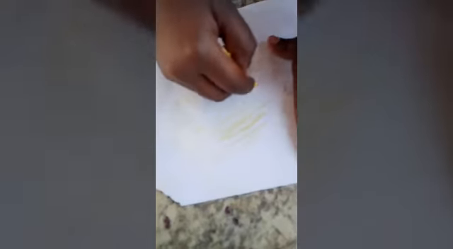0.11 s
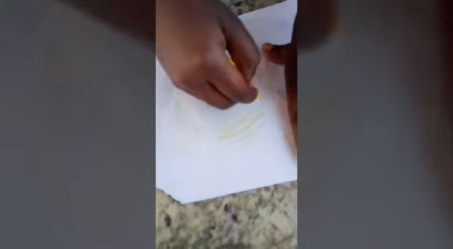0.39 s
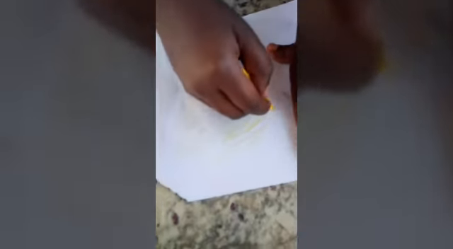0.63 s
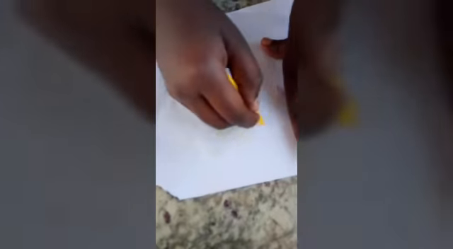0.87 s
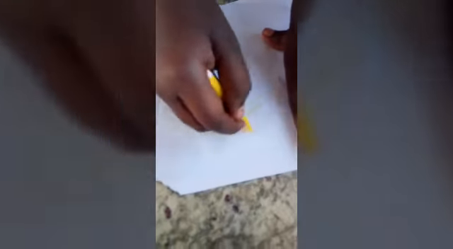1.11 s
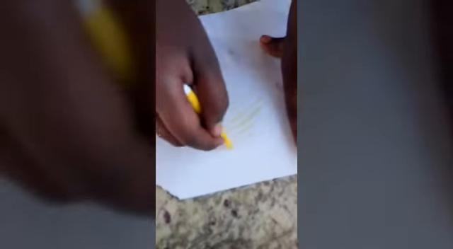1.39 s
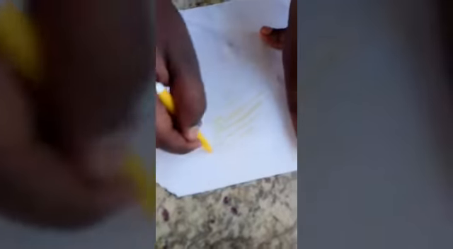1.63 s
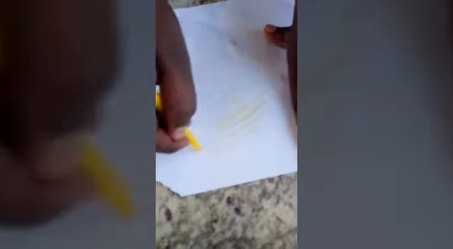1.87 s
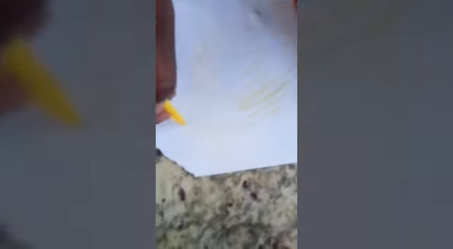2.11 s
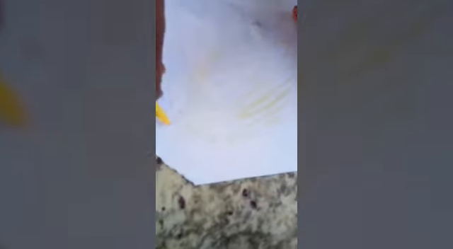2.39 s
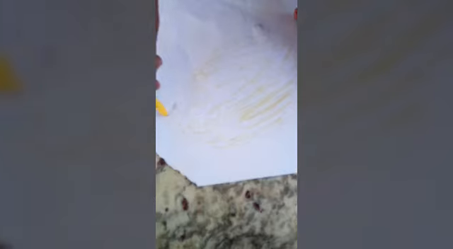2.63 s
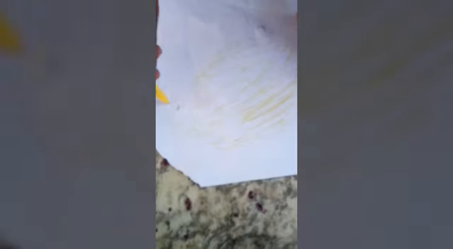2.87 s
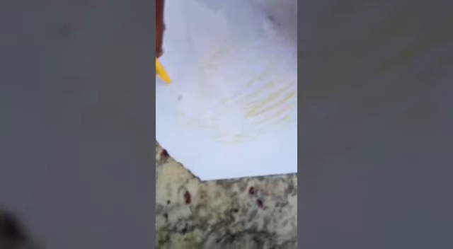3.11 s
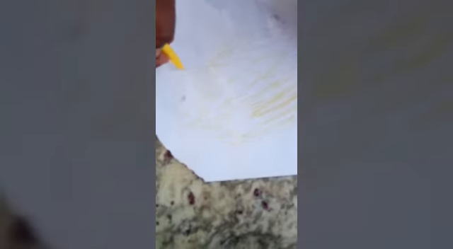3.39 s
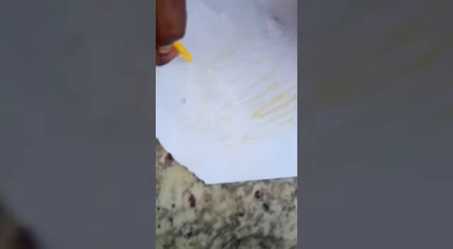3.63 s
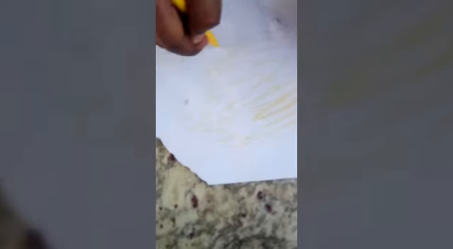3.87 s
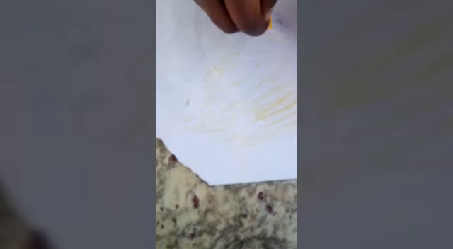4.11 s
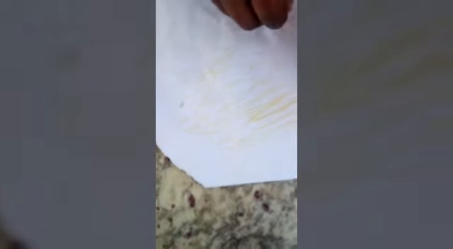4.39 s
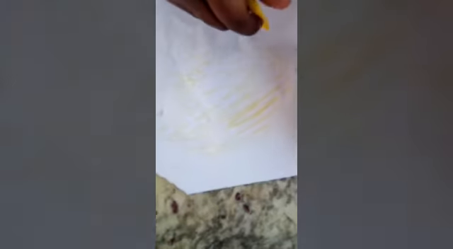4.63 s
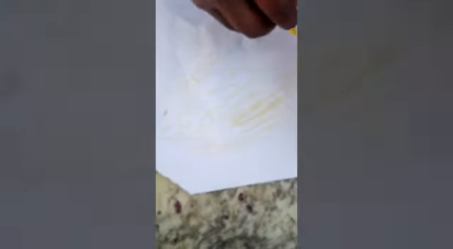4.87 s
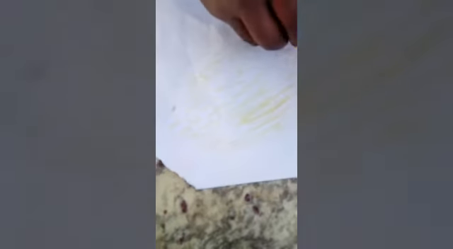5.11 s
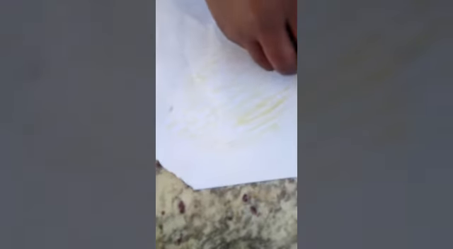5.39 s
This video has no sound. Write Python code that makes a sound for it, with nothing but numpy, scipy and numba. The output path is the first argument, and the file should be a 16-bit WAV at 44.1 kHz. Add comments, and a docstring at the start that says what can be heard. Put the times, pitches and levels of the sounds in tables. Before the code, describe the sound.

Close to a stereo microphone, a yellow coloring stick scribbles on paper lying on stone. Bright, grainy strokes come several per second, growing harder until about 4.3 seconds, then breaking off. Behind them a vehicle rumbles away with a sinking whine, distant crows caw, and a bird chirps once. Only faint touches and a late soft stroke remain over light hiss.

```python
"""On a sheet of paper lying on stone, a felt tip scribbles back and forth close to two microphone ports.
Fibres catch and slip in dense random grains that ring in the sheet; the hand's edge rubs as soft noise.
A small dull knock is one damped tone. A bird chirps once and far crows caw as noise in resonances, and a vehicle
draws away: coloured noise for rumble and roar, narrow noise for drones and a sinking whine. Hiss lies under all."""
import sys
import numpy as np
from scipy import signal
from scipy.fft import rfft, irfft, next_fast_len
from scipy.io import wavfile
from numba import njit

SR = 44100
rng = np.random.default_rng(int(sys.argv[2]) if len(sys.argv) > 2 else 0)


def boost(x):
    """Linear amplitude factor 10**(x/20) for a level x in decibels (scalar or array-like)."""
    u = np.asarray(x, float) / 20
    return 10 ** u


def to_wav(s):
    """Save 16-bit WAV."""
    ch = np.atleast_2d(s).T  # columns
    pcm = np.round(np.clip(ch, -1, 1) * 32767)  # PCM
    wavfile.write(sys.argv[1], SR, pcm.astype(np.int16))


N = 242671
SIZE = next_fast_len(N)
GRID_HZ = np.arange(SIZE // 2 + 1) * SR / SIZE
SILENT_DB = -95

# pen strokes: peak t/s, peak level/dB, rise/s, fall/s, sheet resonance f/Hz
STROKES = [(.1, -42.5, 0.16, 0.16, 8200), (.185, -41, 0.21, 0.31, 9300), (.34, -45.5, 0.022, 0.15, 8500),
           (.455, -39, 0.12, 0.12, 10000), (.6, -52, 0.19, 0.13, 8300), (0.707, -34.5, 0.19, 0.14, 9680),
           (.84, -46.5, .015, 0.11, 10050), (.95, -31.5, 0.074, 0.15, 9840),
           (1.095, -42, 0.012, 0.14, 10050), (1.205, -31.5, 0.06, 0.11, 10600),
           (1.354, -45, 0.027, 0.042, 8400), (1.424, -36, 0.054, 0.19, 8960),
           (1.672, -37, 0.17, 0.11, 8400), (1.775, -40.5, 0.052, 0.091, 8400),
           (1.843, -37, 0.02, 0.34, 9300), (2.006, -31, 0.054, 0.044, 8600),
           (2.09, -39.5, 0.16, 0.31, 9400), (2.293, -40.5, 0.036, 0.13, 8600),
           (2.45, -42.5, 0.22, 0.054, 9040), (2.494, -33, 0.014, 0.21, 9230),
           (2.635, -37.5, .1, 0.12, 9500), (2.755, -35.5, 0.14, 0.24, 9060),
           (2.89, -29.5, 0.093, 0.035, 9300), (3.019, -37, 0.016, 0.1, 8970), (3.109, -34, 0.16, .2, 9230),
           (3.227, -40.5, 0.014, 1, 8650), (3.385, -30, .1, 0.19, 9700), (3.55, -38, 0.36, 0.12, 8660),
           (3.659, -28, 0.13, 0.095, 9400), (3.75, -45.5, .03, .4, 8850), (3.883, -27.5, 0.14, 0.21, 9420),
           (4.06, -67, 0.086, .2, 8600), (4.189, -26.5, 0.14, 0.13, 8400),
           (4.297, -37.5, 0.044, 0.045, 7740), (4.386, -44, 0.075, .04, 8000),
           (4.48, -33.5, 0.089, 0.28, 8400), (4.65, -43.5, 0.099, 0.087, 8600),
           (4.779, -70, .03, 0.051, 9800), (5.144, -45, 0.0065, 0.036, 10400),
           (5.292, -45.5, 0.036, 0.024, 10200), (5.5, -39, 0.28, .1, 8150)]
# the tip halts or lifts at a turn: t/s, length/s, dip/dB
HALTS = [(0.292, .025, -6.5), (0.783, 0.049, -5), (1.824, .012, -7), (2.482, .018, -4), (2.708, .012, -11),
         (2.911, 0.096, -5.5), (3.16, 0.067, -18.5), (3.715, .02, -10), (3.983, 0.051, -11),
         (4.312, 0.057, -12.5), (4.416, 0.029, -3.5), (4.73, 0.048, -9.5), (4.82, 0.24, -4)]
# the tip lands or snags: t/s, level before the burst's envelope/dB
SNAGS = [(2.4933, -31), (2.7214, -32.5), (2.8779, -33.5), (3.018, -29), (4.4413, -37), (5.142, -43),
         (5.224, -46), (5.2714, -48.5), (1.836, -36)]
# broad colour of the scratch: f/Hz, relative level per Hz/dB
SHEET_COLOUR = [(2060, -26), (3500, -34.5), (4260, -24), (4820, -16.5), (5360, -11.5), (7610, -2.5),
                (9440, -1.5), (10400, -2), (11900, -16.5), (13800, -19), (15300, -29.5)]
# how the scratch leans between the ports: f/Hz, left minus right/dB
NEAR_LEANING = [(4500, 7), (7000, -10.5), (9500, 6), (14000, 41)]
# dull band of the scratch under a middling stroke: t/s, level/dB
RUB = [(0, -39), (.1, -46.5), (.5, -47.5), (1, -52), (1.5, -50.5), (1.95, -58), (2.02, -51), (2.1, -54),
       (2.4, -58.5), (2.9, -60), (3.3, -51), (3.7, -57.5), (4.05, -57), (4.2, -57.5), (4.4, -65),
       (4.6, -54), (5.5, -76)]
# airy top of the scratch, against its usual share: t/s, level/dB
TREBLE = [(0, 4), (1.2, 2), (1.7, 1), (2.4, -2), (2.8, -6), (3.3, -1), (3.8, 0.5), (4.2, 0.5), (5.5, -1)]
# soft noises, first a short faint bird chirp near 3 kHz, then the edge of the hand sliding on the sheet:
# start t/s, length/s, first level/dB, last level/dB, resonance f/Hz, width/Hz
SOFT_NOISES = [(1.913, .04, -60, -62, 3150, 400), (2.24, 0.62, -61.5, -69.5, 3050, 400),
               (5.385, 0.111, -71, -58.5, 3590, 1500)]
BIRD_CHIRP, HAND_SLIDES = SOFT_NOISES[:1], SOFT_NOISES[1:]
# small dull knock: t/s, peak level before panning/dB, f/Hz
KNOCKS = [(3.9545, -40, 1370)]
# far caws: start t/s, loudest t/s, end t/s, level/dB, throat resonance f/Hz, width/Hz
CAWS = [(0.436, 0.48, .84, -46, 1595, 240), (1.685, 1.74, 2.23, -47.5, 1562, 267),
        (3.035, 3.055, 3.09, -56.5, 1510, 290), (3.265, 3.325, 3.36, -56.5, 1600, 390),
        (3.986, 4.163, 4.29, -55, 1347, 90), (4.704, 4.84, 5.01, -51, 1378, 60.5),
        (5.317, 5.355, 5.405, -54, 1440, 140), (5.443, 5.485, 5.54, -64, 1880, 160)]
# vehicle drawing away: t/s, rumble level/dB, tyre roar level/dB, deep throb level/dB
TRAFFIC = [(0, -50, -42.5, -51), (.6, -47.5, -47.5, -55), (1.4, -51.5, -50.5, -55), (2.3, -50, -52, -58.5),
           (3.05, -50, -55.5, -58.5), (3.6, -56.5, -58, -59), (4.1, -57, -61.5, -60.5),
           (4.6, -60, -65.5, -62.5), (5.1, -64.5, -66, -64), (5.5, -60, -65.5, -64)]
# colour of the vehicle's noise: f/Hz, relative level per Hz/dB
STREET_COLOUR = [(18, -48), (30, -18), (86, -6), (154, -3.5), (237, 2.5), (274, -1), (542, -1.5), (787, -8),
                 (1120, -6), (2040, -36), (2960, -32.5), (3710, -41), (4200, -34.5), (5460, -39.5),
                 (9240, -120)]
# noisy drone lines: f/Hz, width/Hz, level/dB, t when it dies away/s
DRONES = [(72, 13, -56.5, 0.79), (148.5, 2.8, -57.5, 0.92), (346, 16, -56, 2.1), (432, 5.8, -51.5, 0.4),
          (248, 20, -48, 0.15)]
# sinking whine: t/s, level/dB, f/Hz
WHINE = [(0, -73, 1344), (.3, -51, 1256), (.7, -68, 1207), (1, -56.5, 1168), (1.25, -48, 1116),
         (1.55, -57, 1080), (2.4, -63, 1065), (3.4, -80, 1065)]
# likeness of far sound at the two ports, -1 being opposite phase: f/Hz, likeness (-1..1)
LIKENESS = [(60, -0.68), (240, -0.97), (940, -0.29), (3740, -0.2), (14800, 0.48)]
# how far sound leans between the ports: f/Hz, left minus right/dB
FAR_LEANING = [(60, -1.5), (150, -1.5), (380, -8), (940, -16), (2360, -13.5), (5920, -5.5), (14800, 20)]
# colour of the room and microphone hiss: f/Hz, relative level per Hz/dB
HISS_COLOUR = [(1200, -20), (2000, -23), (3500, -5), (6000, -11), (8200, -2), (10500, -12), (11800, -12),
               (13000, -17), (15000, -45)]


def in_time(rows):
    """Turn the columns of a table into curves at the sample rate."""
    s, *columns = np.transpose(rows)
    return [np.interp(np.arange(N) / SR, s, c) for c in columns]


def at_hz(points, hz):
    """Read a table over frequency on a log-frequency axis."""
    table_hz, values = np.transpose(points)
    return np.interp(np.log(hz + 1e-3), np.log(table_hz), values)


def rms_one(x):
    """Scale to rms 1."""
    return x / np.sqrt(np.mean(x ** 2) + 1e-20)


def coloured(x, gain):
    """Filter by a gain given on the FFT grid."""
    return irfft(rfft(x, SIZE) * gain, SIZE)[..., :N]


def drift(rate_hz, channels=1):
    """Random wandering of rms 1: noise smoothed by two equal low-pass poles."""
    r = np.exp(-2 * np.pi * rate_hz / SR)
    noise = rng.standard_normal((channels, N + 9000))
    return rms_one(signal.lfilter([1], [1, -2 * r, r * r], noise)[:, 9000:])   # skip the filter's start


@njit
def gliding(x, hz, width_hz, sr):
    """A resonance whose centre and width move; white noise keeps its total power, whatever the width."""
    y = np.zeros_like(x)
    for i in range(2, len(x)):
        r = np.exp(-np.pi * width_hz[i] / sr)
        drive = np.sqrt((1 - r * r) / 2) * (x[i] - x[i - 2])
        y[i] = drive + 2 * r * np.cos(2 * np.pi * hz[i] / sr) * y[i - 1] - r * r * y[i - 2]
    return y


def panned(x, pan_db):
    """Share the power between left and right; positive dB leans left."""
    left = boost(pan_db / 2)
    return x * np.array([left, 1 / left]) / np.sqrt((left ** 2 + left ** -2) / 2)


def pen():
    """Fibre slips excite the sheet; harder strokes focus the sound in its resonances."""
    rub_top_hz, air_hz = 6340.0, 11600.0
    rub_follows, middling_db = 0.59, -41   # share of the scratch's swing that the dull band follows
    scratch_db, sheet_hz = strokes()
    force = boost(scratch_db + 1.03 * drift(31) + 1.03 * drift(150) + 1.02 * drift(500))

    gain = panned(boost(at_hz(SHEET_COLOUR, GRID_HZ)), at_hz(NEAR_LEANING, GRID_HZ))
    sheet = coloured(fibre_slips(), gain)
    low = 1 / np.sqrt(1 + (GRID_HZ / rub_top_hz) ** 12)
    rub = rms_one(coloured(sheet, low))
    bright = rms_one(coloured(sheet, np.sqrt(1 - low ** 2)))
    airy = coloured(bright, 1 / np.sqrt(1 + (air_hz / (GRID_HZ + 1)) ** 16))
    airy_gain = boost(in_time(TREBLE)[0] + 4.7 * drift(8.5)[0])
    bright = bright + (airy_gain - 1) * airy

    # level of the dull band, relative to the scratch
    rub_db = in_time(RUB)[0] - middling_db - (1 - rub_follows) * (scratch_db - middling_db)
    rub_db = np.minimum(rub_db + 3.1 * drift(18.5)[0], 6.0)
    # each port hears the sheet from another angle, the right one lower in pitch
    peak = np.array([ringing(sheet[0], sheet_hz * 1.02), ringing(sheet[1], sheet_hz * .93)])
    focus = np.clip(.5 + 0.033 * (scratch_db + 38.0), .05, .95)
    sound = np.sqrt(1 - focus) * bright + np.sqrt(focus) * peak + boost(rub_db) * rub
    pan_db = np.clip(5.0 + 0.3 * (scratch_db + 41.0), -4, 10)   # hard strokes beam towards the left port
    return panned(sound * np.hypot(force, snags()), pan_db)


def strokes():
    """Scratch level in dB and resonance in Hz: peaks that rise and fall, cut by halts."""
    span_db, roundness = 29.5, 0.99   # rise and fall are the times to lose this much
    halt_edge_s, rest_db = .0035, -82   # the resting tip still whispers
    t = np.arange(0, N + 32, 32) / SR
    s, peak_db, rise_s, fall_s, hz = np.transpose(STROKES)[..., None]
    before = (s - t) / np.maximum(rise_s, .004)
    after = (t - s) / np.maximum(fall_s, .004)
    away = np.where(t < s, before, after)
    power = boost(2 * np.maximum(peak_db - span_db * away ** roundness, 2 * SILENT_DB))
    dip_db = np.zeros(len(t))
    for at, length, db in HALTS:
        begun = np.tanh((t - at) / halt_edge_s)
        over = np.tanh((t - at - length) / halt_edge_s)
        dip_db += db / 2 * (begun - over)
    total = power.sum(axis=0)
    level_db = 10 * np.log10(total * boost(2 * dip_db) + boost(2 * rest_db))
    resonance_hz = (power * hz).sum(axis=0) / total   # the stronger stroke counts more
    return in_time(np.transpose([t, level_db, resonance_hz]))


def fibre_slips():
    """Random clicks of either sign as fibres let go, partly shared by the two ports."""
    slips_per_s, spread_db, shared = 14000, 2, 0.12
    sizes = boost(spread_db * np.minimum(rng.exponential(1, (3, N)), 5)) * rng.choice([-1, 1], (3, N))
    common, left, right = rms_one(sizes * (rng.random((3, N)) < slips_per_s / SR))
    # the left port is nearer to the tip: it hears the common slips 40 samples sooner
    together = np.array([np.roll(common, shift=-40), common])
    return np.sqrt(shared) * together + np.sqrt(1 - shared) * np.array([left, right])


def snags():
    """Short bursts of force as the tip lands or snags: quick rise, exponential fade."""
    rise_s, fade_s = 0.00098, 0.0038
    burst = np.zeros(N)
    for s, level_db in SNAGS:
        start = round(s * SR)
        t = np.arange(N - start) / SR
        burst[start:] += boost(level_db) * (1 - np.exp(-t / rise_s)) * np.exp(-t / fade_s)
    return burst


def ringing(x, centre_hz):
    """Three neighbouring sheet modes that wander and trade strength as the tip moves."""
    width_hz = np.full(N, 246.0)
    total = np.zeros(N)
    for sign, ratio in [(1, .92), (-1, 1.001), (1, 1.08)]:
        strength = boost(6.7 * np.tanh(drift(9.6)[0]))
        mode_hz = centre_hz * ratio * boost(0.76 * drift(24.1)[0])   # pitch wanders by about 9 %
        total += sign * strength * gliding(x, mode_hz, width_hz, SR)
    return rms_one(total)


def soft_noise(rows):
    """Soft, uneven noise in one broad resonance, stronger at the right port."""
    edge_s = 0.019
    points = []
    for s, length, first_db, last_db, *tone in rows:
        end = s + length
        points += [(s - edge_s, SILENT_DB, *tone), (s, first_db, *tone)]
        points += [(end, last_db, *tone), (end + edge_s, SILENT_DB, *tone)]
    level_db, centre_hz, width_hz = in_time(points)
    noise = []
    for x in rng.standard_normal((2, N)):
        once = gliding(x, centre_hz, width_hz, SR)
        noise.append(gliding(once, centre_hz, width_hz, SR))
    port_db = np.array([[1.5], [4.0]])   # left, right
    return rms_one(np.array(noise) * np.sqrt(width_hz)) * boost(level_db + 2.4 * drift(13) + port_db)


def hand():
    """Friction noise as the edge of the hand slides on the sheet."""
    return soft_noise(HAND_SLIDES)


def knock():
    """One damped mode: a sine that dies away exponentially."""
    t60_s = 0.025   # time to fall by 60 dB
    out = np.zeros(N)
    for s, peak_db, hz in KNOCKS:
        t = np.maximum(np.arange(N) / SR - s, 0)
        out += boost(peak_db - 60 * t / t60_s) * np.sin(2 * np.pi * hz * t)
    return out * boost(np.array([[-7.0], [4.0]]))   # left, right dB


def bird():
    """One short faint chirp: a blip of noise in a resonance near 3 kHz."""
    return soft_noise(BIRD_CHIRP)


def crows():
    """Hoarse calls that sag in pitch: distance leaves only noise in the strongest throat resonance."""
    edge_s, ends_db = 0.032, -8.5   # a caw starts and ends softer and hoarser
    sag_hz_per_s, end_spread_hz = 250, 110
    rows = []
    for start, loudest, end, db, hz, width in CAWS:
        shape = [(start - edge_s, SILENT_DB), (start, db + ends_db), (loudest, db),
                 (end, db + ends_db), (end + edge_s, SILENT_DB)]
        for s, level in shape:
            rows += [(s, level, hz - sag_hz_per_s * (s - loudest), width + end_spread_hz * (s != loudest))]
    level_db, throat_hz, width_hz = in_time(sorted(rows))
    width_hz = np.clip(width_hz, 20, 900)
    voice = []
    for x in rng.standard_normal((2, N)):
        once = gliding(x, throat_hz, width_hz, SR)
        voice.append(gliding(once, throat_hz, 0.96 * width_hz, SR))
    rasp_db = 1.0 * drift(22)
    port_db = np.array([[-1.5], [4.5]])   # left, right
    return rms_one(np.array(voice) * np.sqrt(width_hz)) * boost(level_db + rasp_db + port_db)


def far_stereo(gain):
    """Two noises mixed to the likeness and leaning of far sound, coloured by gain."""
    alike = np.clip(at_hz(LIKENESS, GRID_HZ), -1, 1)
    mid, side = rng.standard_normal((2, N))
    mid = coloured(mid, gain * np.sqrt(1 + alike))
    side = coloured(side, gain * np.sqrt(1 - alike))
    pair = np.array([mid + side, mid - side])
    return rms_one(coloured(pair, panned(1, at_hz(FAR_LEANING, GRID_HZ))))


def vehicle():
    """Rumble, throb and tyre roar as coloured noise, with drones and a whine, fading with distance."""
    split_hz, deep_top_hz = 1210.0, 247.0
    rumble_db, roar_db, deep_db = in_time(TRAFFIC)
    swell_db = .9 * drift(4)
    colour = boost(at_hz(STREET_COLOUR, GRID_HZ))
    low = 1 / (1 + (GRID_HZ / split_hz) ** 6)
    deep = 1 / (1 + (GRID_HZ / deep_top_hz) ** 6)
    uneven_db = 1.4 * drift(6.5) + 1.2 * drift(13.6)
    rumble = far_stereo(colour * low * (1 - deep)) * boost(rumble_db + swell_db + uneven_db)
    throb = far_stereo(colour * deep) * boost(deep_db + swell_db)
    roar = far_stereo(colour * (1 - low)) * boost(roar_db + swell_db)
    return rumble + throb + roar + drones() + whine()


def drones():
    """Narrow bands of noise at fixed pitches, each dying away in its own time."""
    fade_s = 0.093
    t = np.arange(N) / SR
    lines = np.zeros((2, N))
    for hz, width, db, end_s in DRONES:
        band = 1 / (1 + (2 * (GRID_HZ - hz) / width) ** 2)
        lines += far_stereo(band) * boost(db) / (1 + np.exp((t - end_s) / fade_s))
    return lines


def whine():
    """Noise through two narrow resonances that sink in pitch together."""
    level_db, hz = in_time(WHINE)
    width_hz = np.full(N, 23.0)
    tone = []
    for x in far_stereo(np.ones_like(GRID_HZ)):
        once = gliding(x, hz, width_hz, SR)
        tone.append(gliding(once, hz, 2 * width_hz, SR))
    return rms_one(np.array(tone)) * boost(level_db)


def hiss():
    """Steady room and microphone noise, separate at each port."""
    noise = rng.standard_normal((2, N))
    return rms_one(coloured(noise, boost(at_hz(HISS_COLOUR, GRID_HZ)))) * boost(-73.5)


def scene():
    """Pen and hand in front, a knock, bird, crows and vehicle beyond, hiss under all."""
    return pen() + hand() + knock() + bird() + crows() + vehicle() + hiss()


def roll_off(x):
    """The treble ends steeply here."""
    return signal.sosfilt(signal.butter(12, 15420, fs=SR, output="sos"), x)


def record(dry):
    """Pass on the finished mix at its own level."""
    return roll_off(dry)


dry = scene()
out = record(dry)
to_wav(out)
```